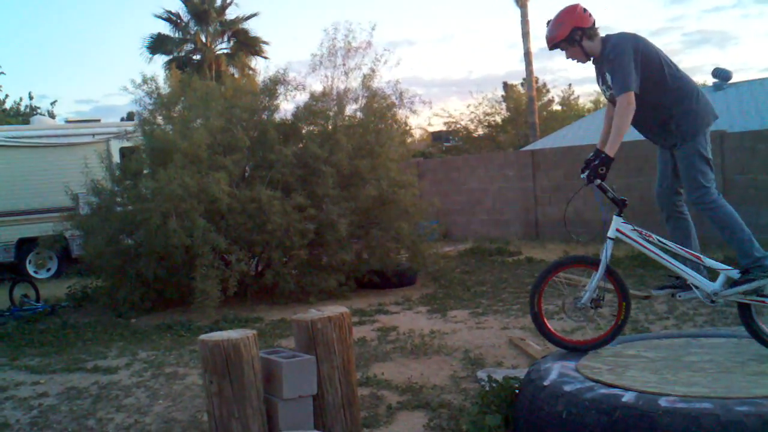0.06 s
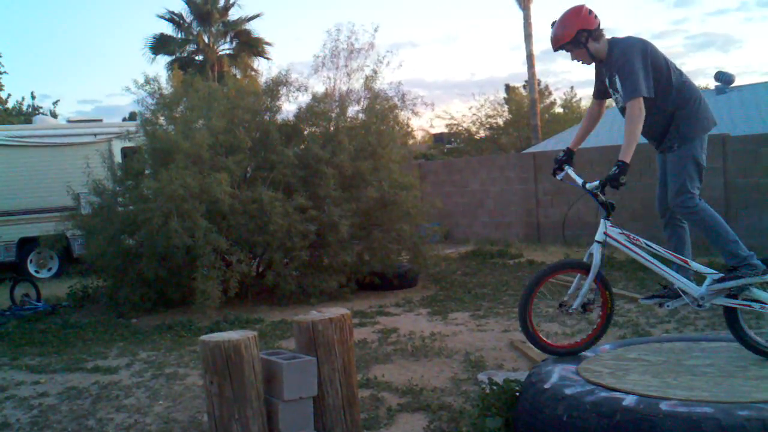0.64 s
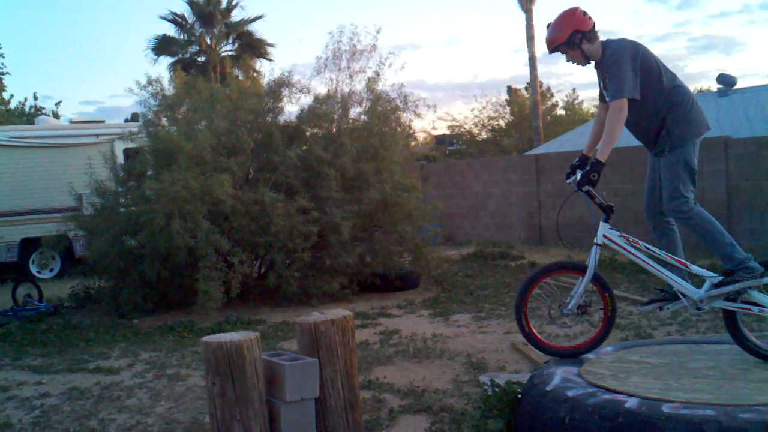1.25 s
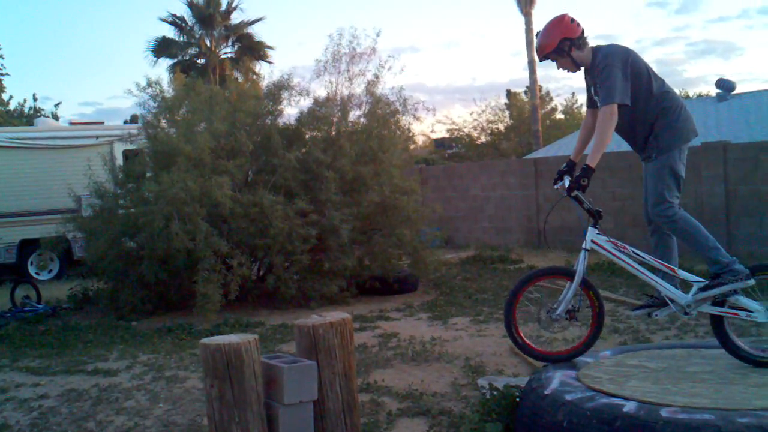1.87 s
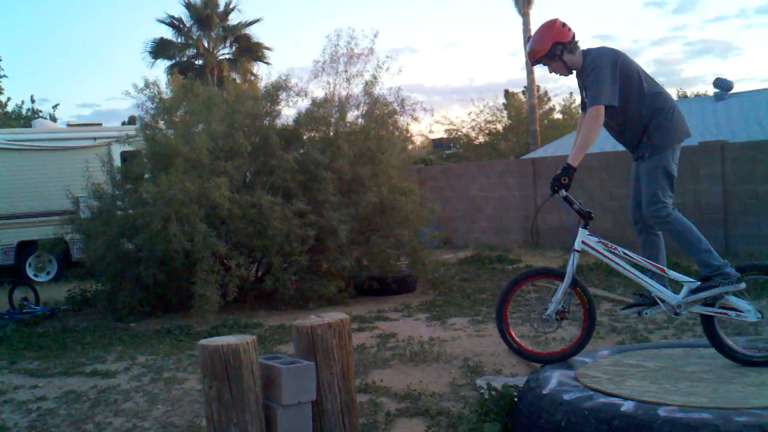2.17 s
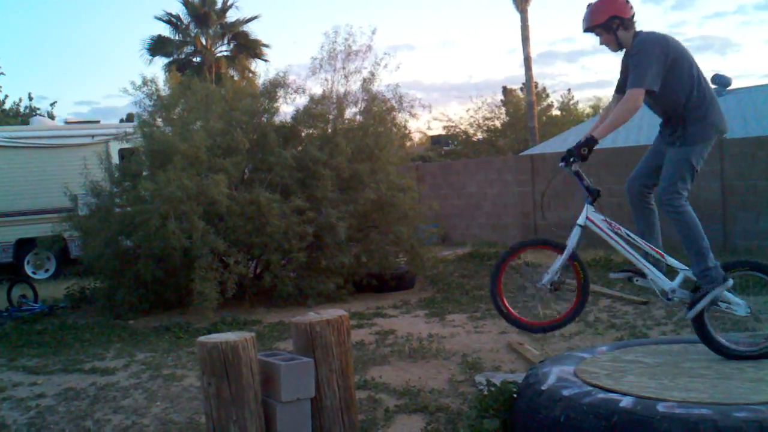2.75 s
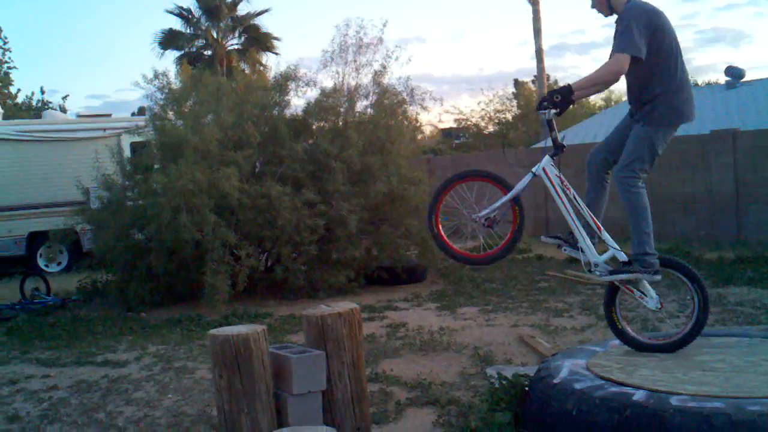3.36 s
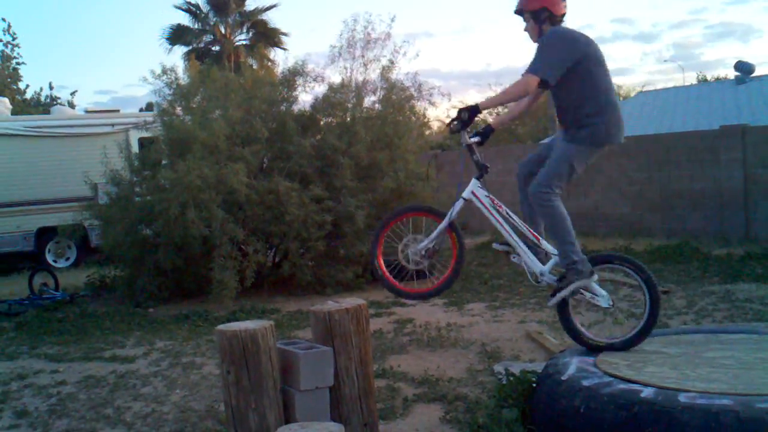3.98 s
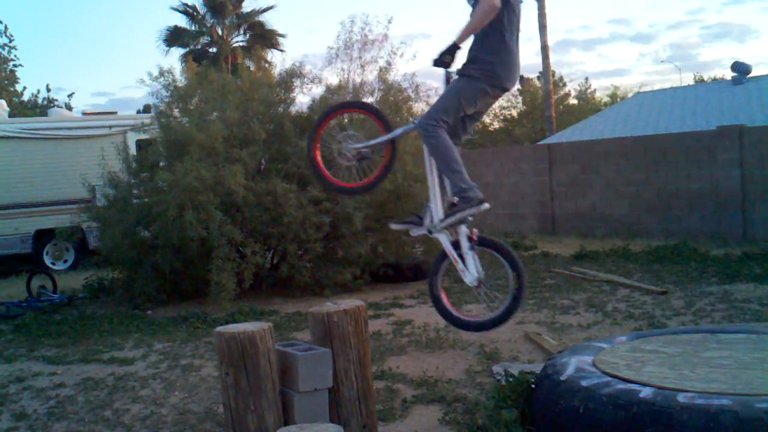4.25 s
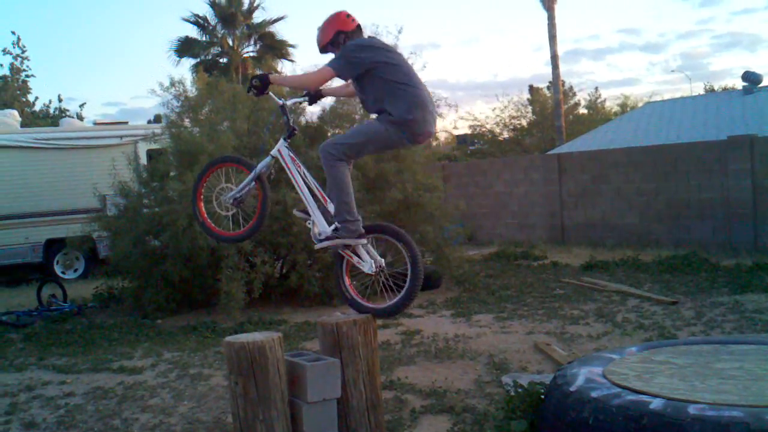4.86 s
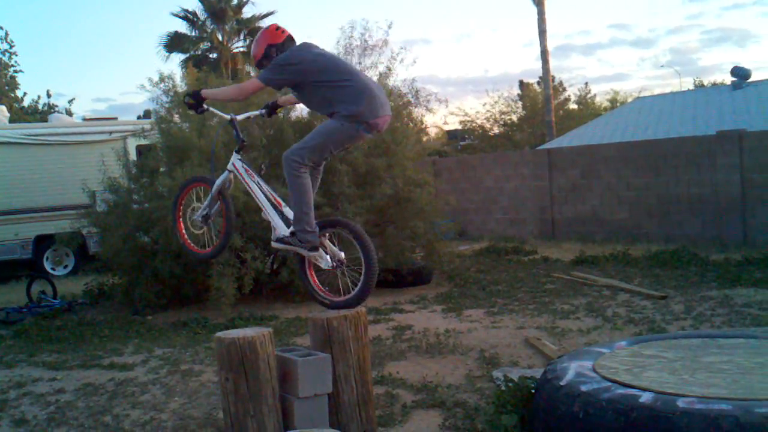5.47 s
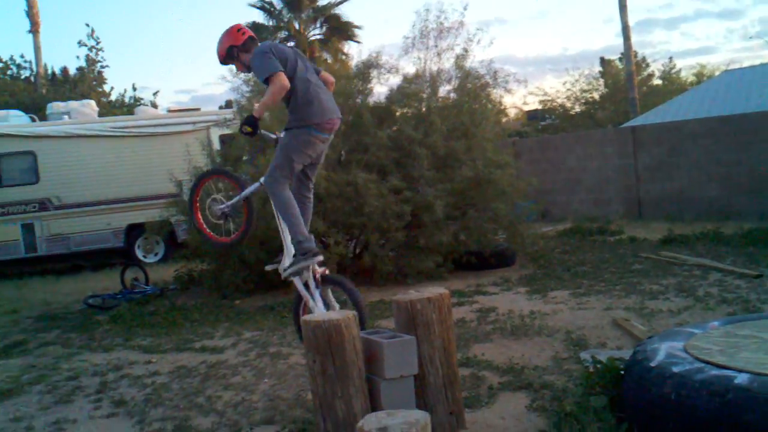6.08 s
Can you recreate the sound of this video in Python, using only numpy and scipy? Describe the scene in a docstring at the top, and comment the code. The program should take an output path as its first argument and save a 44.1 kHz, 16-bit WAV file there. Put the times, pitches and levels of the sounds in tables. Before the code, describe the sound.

A bike hops on its back wheel with hollow tyre thumps, metal clicks and two sharp brake squeaks in a quiet yard.

```python
"""Trials bike hopping in a yard

A bike hops on its back wheel across a big tyre, then leaps onto a wooden post in a quiet walled yard.
Each landing rings the air in the tyre and shakes the frame. Steel parts click, the tread scuffs and
the brake squeals as it bites. The walls echo and a town rumbles far away. Two close microphones are
made to sound wider by subtracting from each a delayed copy of the other."""
import sys
import numpy as np
from scipy import signal
from scipy.fft import rfft, irfft
from scipy.io import wavfile
from scipy.ndimage import uniform_filter1d

SR = 44100
rng = np.random.default_rng(int(sys.argv[2]) if len(sys.argv) > 2 else 0)


def unload_wav(signal):
    """Save mono or channel-first audio to the path in sys.argv[1] as 16-bit WAV at rate SR, clipped to [-1, 1]."""
    wavfile.write(
        sys.argv[1],
        SR,
        np.round(np.clip(np.atleast_2d(signal).T, -1, 1) * 32767).astype(np.int16),
    )


N = 269892
TIME = np.arange(N) / SR
HIT_TIME = np.arange(16384) / SR  # seconds within one blow
LEAD = 256  # samples of silence before a burst

# back wheel landings: start_s, squash_s, thump_db, boom_db, clack_db, rattle_db
LANDINGS = [(0.042, .011, -35, -7.5, -47.5, -49.5), (2.538, .008, -33, -2, -44.5, -52),
            (3.058, .010, -32, -2.5, -36, -35.5), (3.730, 0.0088, -35.5, -0.5, -32, -40),
            (4.523, .004, -34.5, -4.5, -30, -41), (5.286, 0.0026, -42.5, -7, -33, -42)]
# how the steel parts ring: pitch_hz, width_hz, level_db
STEEL_MODES = [(1994, 160, 4), (3587, 530, -4), (5950, 230, 0), (6450, 130, 0), (8580, 330, -2),
               (9300, 110, 0.5), (10900, 900, -16)]


def wheel_blows(lap_s=0.0048, lap_db=-5, rise_s=0.00053):
    """A pulse of air circles inside the tyre; the deck thuds, the frame clacks, the chain rattles."""
    # the air in the tyre and the deck under it: pitch_hz, level_db, ring_s (time to fade by 60 dB)
    tyre_modes = [(63.5, -31, .12), (95.8, -4, 0.32), (138.2, 3.5, 0.12), (186.3, -5, 0.21),
                  (237, -22, 0.038), (273.3, 1.5, 0.089), (347, -20, 0.017), (415.5, -4.5, 0.2)]
    # tone colours of deck, frame and chain: frequency_hz, level_db
    deck_colour = [(30, -44), (80, -15.5), (150, 8), (400, 1), (650, -24.5), (1500, -29.5), (4000, -59)]
    frame_colour = [(100, -9), (400, -22), (800, 10), (1300, 0), (1850, 7), (2500, -2), (4000, -56),
                    (14000, -52)]
    chain_colour = [(500, -40), (2200, 10), (3600, 8), (5000, 1), (6400, 14), (9000, -3.5), (11000, 3),
                    (14000, -16)]
    out, hz = np.zeros((2, N)), bins(HIT_TIME)
    ring = sum(amp(db - 60 * HIT_TIME / ring_s) * np.sin(2 * np.pi * pitch_hz * HIT_TIME)
               for pitch_hz, db, ring_s in tyre_modes)
    ring *= 1 - np.exp(-HIT_TIME / rise_s)
    pulse_age = HIT_TIME % lap_s / rise_s
    pulses = amp(lap_db * (HIT_TIME // lap_s)) * pulse_age ** 2 * np.exp(-pulse_age)
    boom = amp(-5) * ring + amp(2) * pulses
    for start_s, thump_db, boom_db, clack_db, rattle_db, decay_s in wheel_contacts():
        add(out, start_s, amp(thump_db + boom_db) * boom)
        thud = amp(thump_db - 4) * burst(amp(curve(deck_colour, hz)), 2.04 * decay_s)
        clack = amp(clack_db) * burst(amp(curve(frame_colour, hz)), decay_s)
        rattle = amp(rattle_db) * burst(amp(curve(chain_colour, hz)), decay_s)
        add(out, start_s - LEAD / SR, thud + clack + rattle)
    return out


def wheel_contacts(touch_db=-4.5, metal_db=-9.5, bounce_db=-20.5):
    """A landing strikes three times: it touches, squashes flat and springs back. A knock strikes once."""
    # the rider shifts weight or the brake catches: start_s, thump_db, clack_db, rattle_db, decay_s
    knocks = [(.476, -50, -61, -76, 0.011), (2.015, -51.5, -58, -82, 0.011),
              (2.620, -64, -49.5, -48.5, 0.0092), (2.651, -45.5, -50, -50.5, .024),
              (3.050, -35, -37.5, -38, 0.0081), (4.030, -55, -49.5, -61, 0.01),
              (4.127, -45, -46.5, -57, 0.014), (4.277, -49, -44, -58, 0.0032),
              (5.512, -71, -49.5, -63, 0.0068), (5.574, -74, -50.5, -46.5, 0.0083),
              (5.903, -62, -54, -72, 0.0069), (5.931, -67, -52.5, -70, 0.0075)]
    for start_s, squash_s, thump, boom, clack, rattle in LANDINGS:
        yield start_s, thump + touch_db, boom, clack, rattle, 0.005
        yield start_s + squash_s, thump, boom, clack + metal_db, rattle + metal_db, 0.0096
        yield start_s + 0.037, thump + bounce_db, boom, clack + bounce_db, rattle + bounce_db, 0.014
    for start_s, thump, clack, rattle, decay_s in knocks:
        yield start_s, thump, 0, clack, rattle, decay_s


def brake_squeals(choke_s=0.011, choke_db=18, slip_hz=13.2, hard_bite_db=-14.5):
    """The brake sticks and slips, growing purer and louder until the wheel locks and chokes the tone."""
    # squeals: start_s, lock_s, peak_db, growth_db, pitch_hz, sag_hz_per_s, roughness
    bites = [(3.015, 0.041, -42, 6.5, 864, 2000, 0.47), (3.625, 0.0056, -45.5, 11, 802, 0, 1.11),
             (4.208, 0.0544, -16.5, 30.5, 877.6, 1698, 0.11), (4.524, 0.017, -14.5, 35, 874.5, 8500, 0.23)]
    # overtones of a hard squeal: pitch_multiple, level_db
    overtone_levels = [(2, -10.5), (3, -22), (4, -36.5), (5, -41), (7, -31)]
    out = np.zeros((2, N))
    for start_s, lock_s, peak_db, growth_db, pitch_hz, sag_hz_per_s, roughness in bites:
        t = np.arange(0, lock_s + 2 * choke_s, 1 / SR)
        sliding = np.maximum(1 - t / lock_s, 0)
        locked_s = np.maximum(t - lock_s, 0)
        choking = locked_s / choke_s
        db = peak_db - growth_db * sliding ** 1.39 - choke_db * choking ** 2.27
        hz = pitch_hz + slip_hz * sliding - sag_hz_per_s * locked_s
        rough = roughness * (0.47 + 0.53 * (sliding + choking))
        jitter = 1 + 0.11 * rough * waver(t, size=70)
        phase = 2 * np.pi * np.cumsum(hz * jitter) / SR
        lag = 2 * np.pi * np.outer([0, 1], hz)  # the right microphone hears it a little later
        overtones = sum(amp(k_db) * (1 + 0.49 * waver(t, size=110)) * np.cos(k * (phase - 1e-4 * lag))
                        for k, k_db in overtone_levels)
        # a hard, rough or choking bite has stronger overtones
        bright_db = 0.45 * (db - hard_bite_db) + 14 * rough + 10.5 * choking
        tone = np.sin(phase - 4e-5 * lag) + amp(bright_db) * overtones
        flutter = 1 + 0.22 * rough * waver(t, size=70)
        add(out, start_s, amp(db) * tone * flutter * signal.windows.tukey(len(t), 0.08))
    return out


def steel_clicks(uneven_db=1.5):
    """Each click rings the steel over a dry snap; no two strike the same spot."""
    # chain, ratchet and levers: start_s, level_db, brightest_hz, spread_octaves, decay_s
    clicks = [(.068, -54.5, 6200, 0.44, 0.004), (.128, -57.5, 9000, 0.13, .008),
              (0.178, -61, 9000, .4, .01), (0.307, -61.5, 7100, 0.29, 0.022),
              (.398, -58.5, 8900, 0.16, .0063), (2.294, -48, 8700, 0.45, 0.0042),
              (2.478, -55.5, 6300, .3, 0.0091), (2.519, -55, 9000, .6, 0.026),
              (2.813, -57, 6860, 0.26, 0.01), (3.203, -42.5, 8100, 0.33, 0.0063),
              (3.269, -46, 7800, 0.51, 0.007), (3.730, -32, 10000, 1.2, 0.0012),
              (3.877, -49.5, 8760, 0.065, 0.019), (3.909, -42.5, 6600, 0.035, 0.008),
              (4.194, -49, 8640, 0.32, 0.024), (4.252, -46.5, 9100, 0.65, 0.024),
              (4.543, -28, 7900, 0.49, 0.0074), (4.640, -39, 7700, 0.91, 0.0098),
              (4.774, -48.5, 6160, 0.14, 0.006), (4.806, -41.5, 7500, 1.5, 0.003),
              (4.844, -54, 3780, 0.19, .0033), (4.981, -52, 6780, 0.79, 0.019),
              (5.284, -40.5, 12100, 0.44, 0.0041), (5.567, -35.5, 8430, 0.45, 0.004),
              (5.983, -50.5, 8100, 0.5, 0.0091)]
    # the dry snap: frequency_hz, level_db
    snap_colour = [(500, -11), (2200, 7), (5000, 0.5), (9000, 4), (14000, -4.5)]
    out, hz = np.zeros((2, N)), bins(HIT_TIME)
    steel = resonances(STEEL_MODES, hz) + 0.13 * amp(curve(snap_colour, hz))
    grid_hz = np.arange(0, SR / 2, 400)
    for start_s, db, brightest_hz, octaves, decay_s in clicks:
        focus = 1 / np.hypot(1, np.log2((hz + 1) / brightest_hz) / octaves)
        spot = amp(uneven_db * np.interp(hz, grid_hz, rng.standard_normal(len(grid_hz))))
        add(out, start_s - LEAD / SR, amp(db) * burst(steel * focus * spot, decay_s))
    return out


def brake_groan(level_db=-53, stutter_db=3.5):
    """The brake slips in fits as the bike settles on the post, never forming a steady tone."""
    # how the brake pads ring: pitch_hz, width_hz, level_db
    pad_modes = [(710, 58, 13.5), (930, 310, -3), (1190, 115, -8)]
    hz = bins(TIME)
    colour = resonances(pad_modes, hz) * resonances([(845, 900, 0)], hz)
    slips = unit_level(stereo(rng.standard_normal((2, N)), colour))
    fits = amp(level_db + stutter_db * waver(TIME, size=400))
    return slips * fits * swell(start_s=5.155, hold_s=0.1, rise_s=0.031, fade_s=0.059)


def tread_scuff(links_db=-7, clump_db=2.2):
    """Grit crunches in clumps under the tread while chain links tick against the steel."""
    # crunching grit: frequency_hz, level_db
    grit_colour = [(60, 0), (200, 9.5), (400, 13), (900, 3.5), (1900, 6), (2800, 0.5), (3800, 0),
                   (5000, -2), (6400, 2.5), (9200, 1), (11000, -2), (14000, -7.5)]
    hz = bins(TIME)
    crunch = grains(per_s=1500, size_db=1) + 0.93 * rng.standard_normal((2, N))
    grit = unit_level(stereo(crunch, amp(curve(grit_colour, hz))))
    grit = unit_level(grit * amp(clump_db * waver(TIME, size=350)))
    links = unit_level(stereo(grains(per_s=160, size_db=-1.5), resonances(STEEL_MODES, hz)))
    scuff = drift_colour(grit + amp(links_db) * links, depth_db=6, half_depth_hz=53000, size=16)
    return scuff * amp(-1) * tread_effort()


def tread_effort():
    """How hard the tread works: rolling, short scrapes and a skid after each landing."""
    # the tread rolls and the chain runs as the rider gets busier: time_s, level_db
    rolling_levels = [(0, -67), (.3, -74.5), (1.72, -79.5), (2.2, -66.5), (2.55, -63), (3.1, -54),
                      (3.48, -70.5), (3.6, -59), (4.1, -63.5), (4.36, -54), (4.5, -61.5), (4.9, -79.5),
                      (5.25, -63), (5.55, -62), (5.85, -76), (5.98, -63.5), (6.12, -58.5)]
    # scrapes at a twist or a pedal kick, and a run of the chain at 4.26 s: peak_s, level_db
    scrape_peaks = [(1.82, -61), (2.33, -55.5), (2.69, -53.5), (2.82, -51.5), (3.877, -50), (4.26, -45),
                    (4.67, -50)]
    rolling = amp(np.interp(TIME, *np.transpose(rolling_levels)))
    scrapes = [amp(db) * swell(peak_s, 0, rise_s=0.049, fade_s=0.037) for peak_s, db in scrape_peaks]
    skids = [amp(clack_db - 18) * swell(start_s + squash_s, 0, rise_s=squash_s, fade_s=0.061)
             for start_s, squash_s, _, _, clack_db, _ in LANDINGS]
    return np.linalg.norm([rolling, *scrapes, *skids], axis=0)


def rubber_rubs():
    """The tread makes small dull slips as the rider balances."""
    # rubber twisting on wood: start_s, hold_s, level_db
    twists = [(1.838, .21, -59.5), (2.67, 0.16, -57), (5.699, 0.022, -54), (5.924, .19, -58.5)]
    # slipping rubber: frequency_hz, level_db
    rubber_colour = [(60, -22), (200, -24), (400, 6.5), (650, -27), (1000, -9.5), (2000, -15), (3000, -19),
                     (6000, -31), (14000, -52)]
    slips = unit_level(stereo(grains(per_s=510, size_db=-1.5), amp(curve(rubber_colour, bins(TIME)))))
    return slips * sum(amp(db - 2) * swell(start_s, hold_s, rise_s=0.0067, fade_s=0.047)
                       for start_s, hold_s, db in twists)


def yard_echoes(sound, tail_db=-10, taps_per_s=3000):
    """A few clear echoes, and a soft tail scattered by fence, bushes and ground."""
    # time for the tail to fade by 60 dB: frequency_hz, fade_s
    fade_times = [(100, 0.77), (400, 0.8), (900, 0.46), (1800, 0.62), (5000, 0.42), (13000, 0.24)]
    # bounces off ground and walls: delay_s, level_db
    echoes = [(0.0142, -16.5), (0.022, -32.5), (.042, -15), (.098, -28)]
    taps = rng.choice([-1., 1.], (2, SR)) * (rng.random((2, SR)) < taps_per_s / SR)
    taps *= TIME[:SR] > 0.01
    hz, t, spectrum = signal.stft(stereo(taps, 1), SR, nperseg=256)
    fade = amp(-60 * t / curve(fade_times, hz)[:, None])
    tail = signal.istft(spectrum * fade, SR, nperseg=256)[1]
    tail *= amp(tail_db) / np.linalg.norm(tail[0]) * np.sqrt(2 / 3)
    for delay_s, db in echoes:
        add(tail, delay_s, amp(db) * np.ones(1))
    return signal.fftconvolve(sound, tail, axes=1)[:, :N]


def town_rumble(level_db=-57, swell_db=0.18):
    """A distant town rumbles in drifting patches, with faint microphone hiss."""
    # rumble and hiss: frequency_hz, level_db
    air_colour = [(20, 6), (45, -24), (70, 2.5), (130, 3.5), (200, 0), (290, 4.5), (550, -9), (900, -9),
                  (1400, -18.5), (2200, -21.5), (3400, -27), (5000, -29.5), (8500, -24), (14000, -24)]
    wash = stereo(rng.standard_normal((2, N)), amp(curve(air_colour, bins(TIME))))
    wash = drift_colour(wash, depth_db=1.57, half_depth_hz=8000, size=7)
    return wash * amp(level_db + swell_db * waver(TIME, size=9000))


def burst(colour, decay_s, attack_s=0.00095):
    """A dying flurry of tiny contacts, coloured by what they strike."""
    fade = np.exp(-HIT_TIME / decay_s)
    flurry = (1 - np.exp(-HIT_TIME / attack_s)) * fade * rng.standard_normal((2, len(HIT_TIME)))
    return unit_level(stereo(np.roll(flurry, LEAD, axis=1), colour)) * np.sqrt(np.mean(fade ** 2))


def grains(per_s, size_db):
    """Scattered tiny contacts of uneven size."""
    sizes = amp(size_db * np.minimum(rng.exponential(1, N), 4))
    return unit_level(rng.standard_normal((2, N)) * (rng.random(N) < per_s / SR) * sizes)


def stereo(noises, colour):
    """Colours two unrelated noises and shares them between left and right, most alike in the bass."""
    # how alike the two microphones sound: frequency_hz, likeness (0 to 1)
    likeness = [(60, 0.29), (125, 0.74), (250, 0.79), (500, 0.38), (1000, 0.57), (2000, 0.046),
                (4000, 0.039), (14000, 0.078)]
    common, apart = rfft(noises) * colour
    alike = curve(likeness, bins(noises))
    common, apart = common * np.sqrt(1 + alike), apart * np.sqrt(1 - alike)
    return irfft(np.array([common + apart, common - apart]), noises.shape[-1]) / np.sqrt(2)


def drift_colour(sound, depth_db, half_depth_hz, size):
    """Lets the tone colour drift in short patches, each about size frequency steps wide."""
    hz, _, spectrum = signal.stft(sound, SR, nperseg=1024)
    patches = uniform_filter1d(rng.standard_normal(spectrum.shape[1:]), size, axis=0)
    patches = unit_level(uniform_filter1d(patches, 7, axis=1))
    spectrum *= amp(depth_db * patches / (1 + hz[:, None] / half_depth_hz))
    return unit_level(signal.istft(spectrum, SR, nperseg=1024)[1][:, :N])


def resonances(modes, hz):
    """How strongly a ringing part answers at each frequency."""
    return sum(amp(db) * 1j * hz * width / (pitch ** 2 - hz ** 2 + 1j * hz * width)
               for pitch, width, db in modes)


def swell(start_s, hold_s, rise_s, fade_s):
    """Grows until start_s, holds at 1, then dies away."""
    before, after = np.maximum(start_s - TIME, 0), np.maximum(TIME - start_s - hold_s, 0)
    return np.exp(-before / rise_s - after / fade_s)


def waver(t, size):
    """A random wobble, smoothed over size samples."""
    return unit_level(uniform_filter1d(uniform_filter1d(rng.standard_normal(len(t)), size), size))


def curve(points, hz):
    """Joins table points with straight lines on a log frequency scale."""
    point_hz, values = np.transpose(points)
    return np.interp(np.log(hz + 1), np.log(point_hz + 1), values)


def amp(db):
    return 10 ** (np.asarray(db) / 20)


def unit_level(sound):
    return sound / np.sqrt(np.mean(sound ** 2) + 1e-20)


def bins(sound):
    return np.fft.rfftfreq(sound.shape[-1], 1 / SR)


def add(mix, start_s, sound):
    part = mix[:, max(round(start_s * SR), 0):][:, :sound.shape[-1]]
    part += sound[..., :part.shape[1]]


def scene():
    """The bike, its echoes and the distant town."""
    bike = wheel_blows() + steel_clicks() + brake_squeals() + brake_groan()
    bike += tread_scuff() + rubber_rubs()
    return bike + yard_echoes(bike) + town_rumble()


def record(dry, delay_s=1 / 2650, cutoff_hz=14100):
    """Each side subtracts a delayed copy of the other to sound wider; then the top treble is cut."""
    # how much of the other side is subtracted: frequency_hz, share
    crossfeed = [(100, 1), (1300, 0.56), (2700, 1), (4000, 1), (5500, 0.18), (8000, 0.23), (14000, 0.32)]
    spectrum, hz = rfft(dry), bins(dry)
    cross = curve(crossfeed, hz) * np.exp(-2j * np.pi * hz * delay_s)
    wide = irfft(spectrum - cross * spectrum[::-1], N)
    lowpass = signal.firwin(511, cutoff_hz, window=("kaiser", 9), fs=SR)
    return signal.oaconvolve(wide, lowpass[None], "same")


dry = scene()
out = record(dry)
unload_wav(out)
```